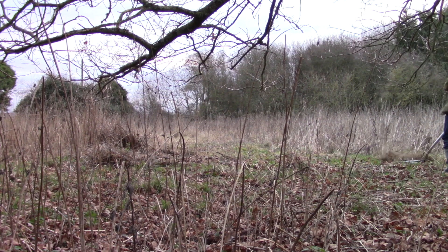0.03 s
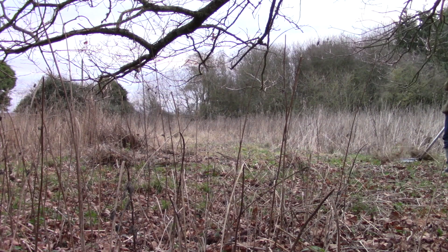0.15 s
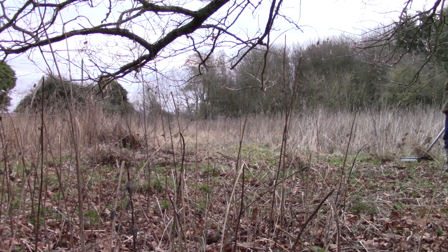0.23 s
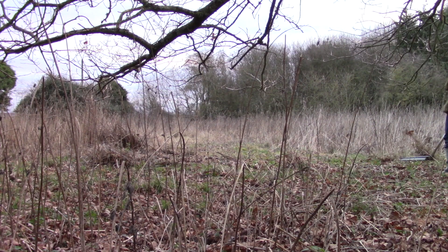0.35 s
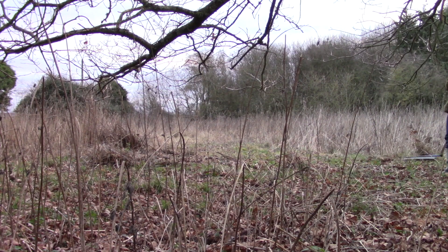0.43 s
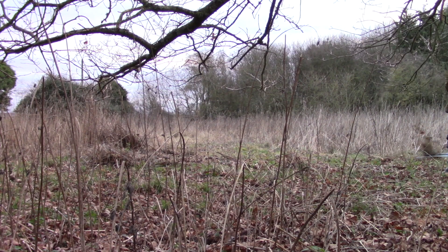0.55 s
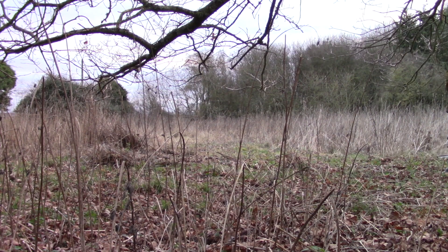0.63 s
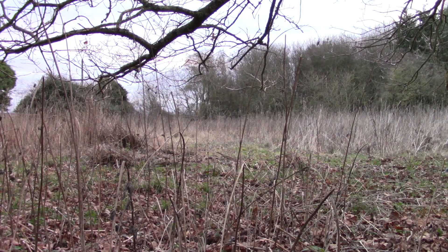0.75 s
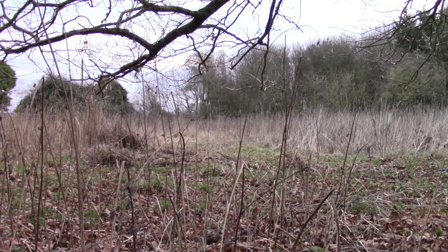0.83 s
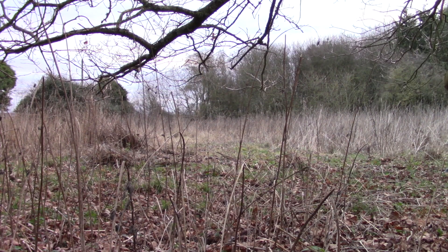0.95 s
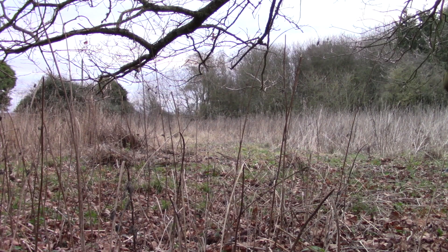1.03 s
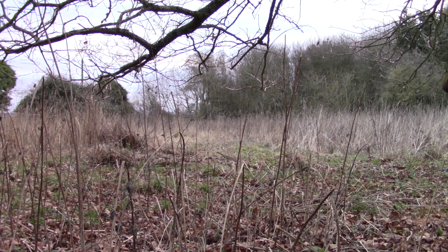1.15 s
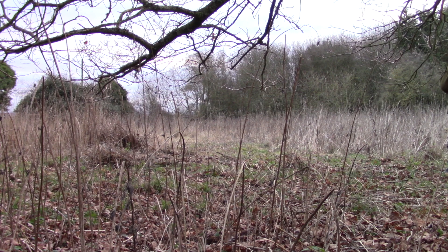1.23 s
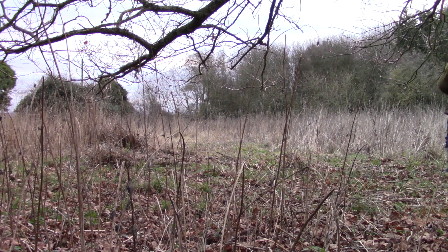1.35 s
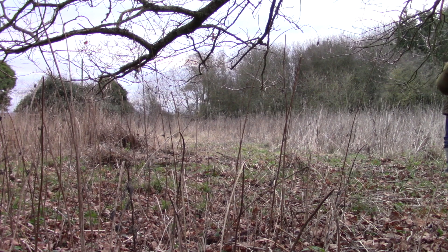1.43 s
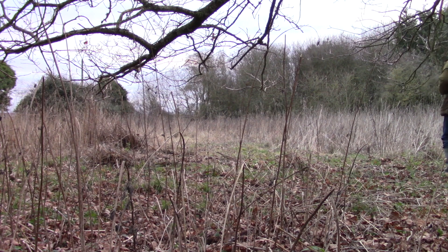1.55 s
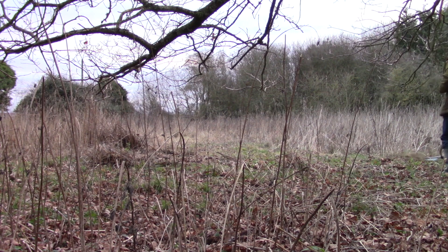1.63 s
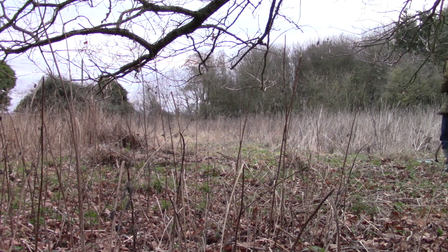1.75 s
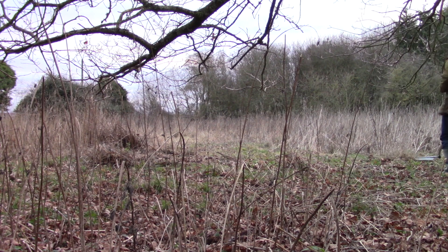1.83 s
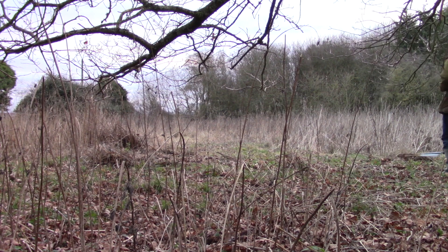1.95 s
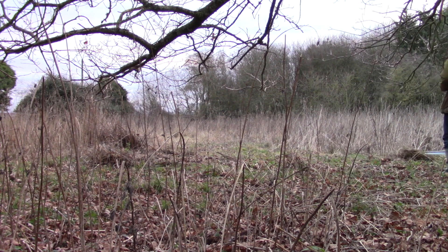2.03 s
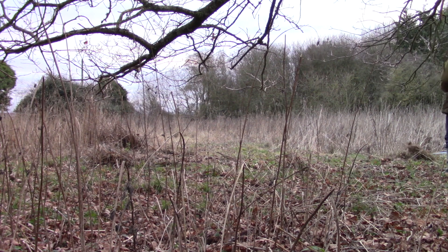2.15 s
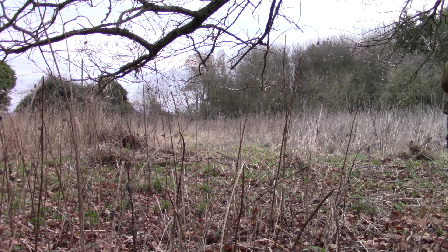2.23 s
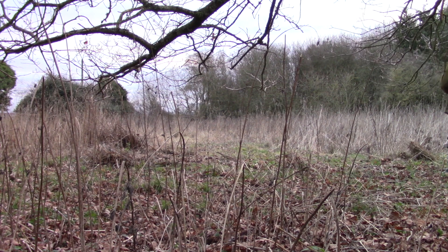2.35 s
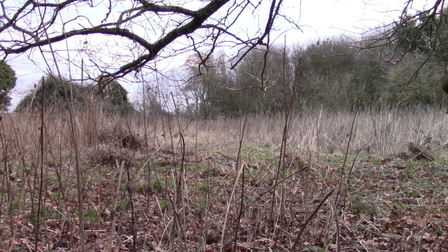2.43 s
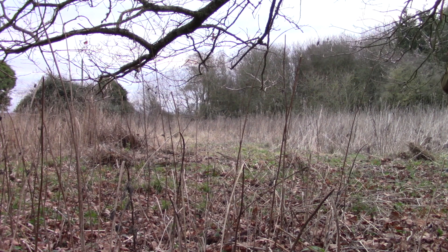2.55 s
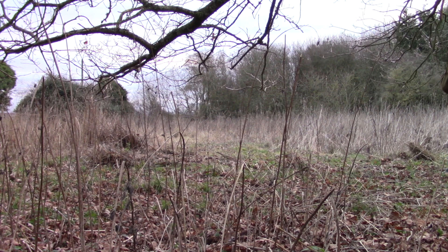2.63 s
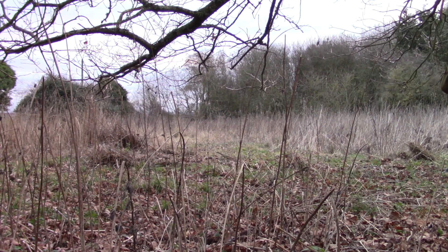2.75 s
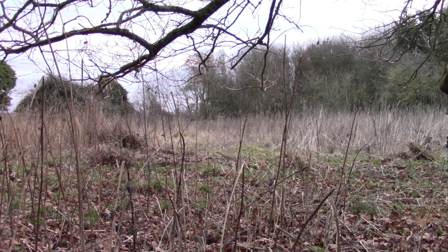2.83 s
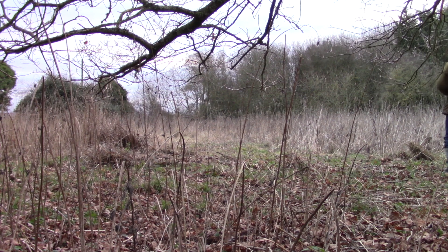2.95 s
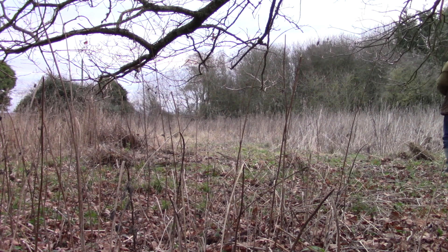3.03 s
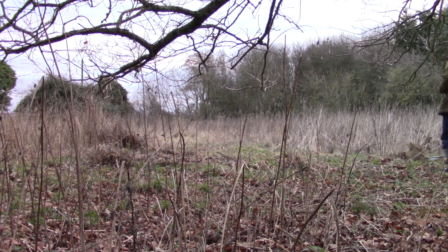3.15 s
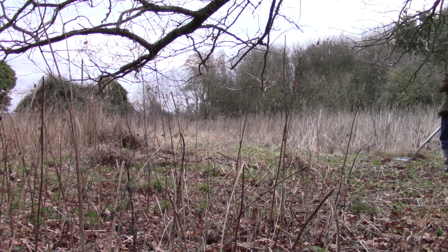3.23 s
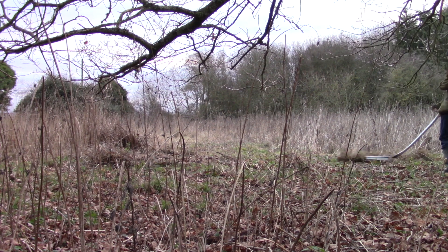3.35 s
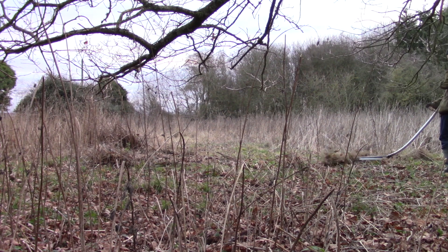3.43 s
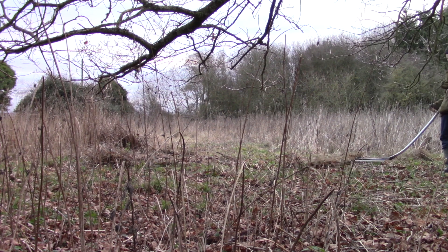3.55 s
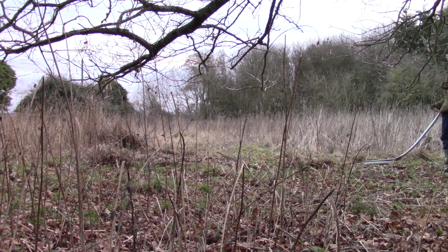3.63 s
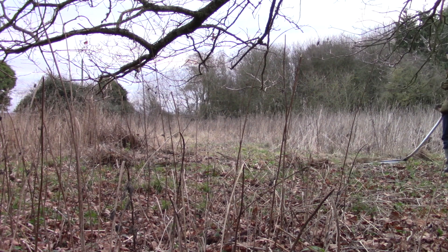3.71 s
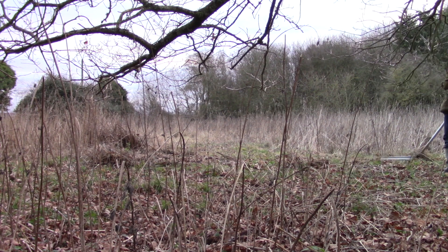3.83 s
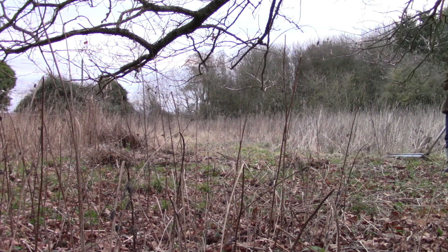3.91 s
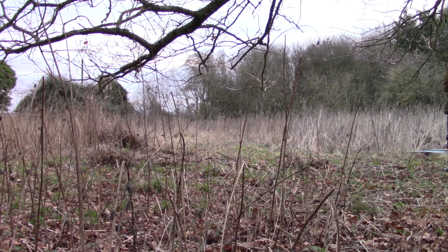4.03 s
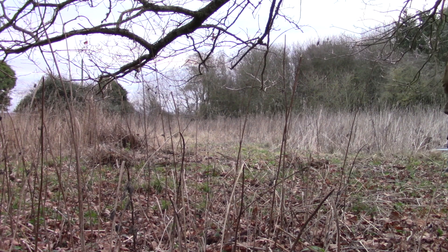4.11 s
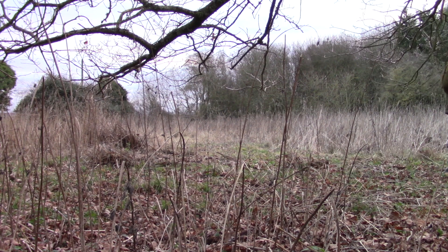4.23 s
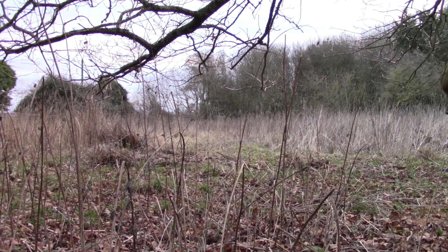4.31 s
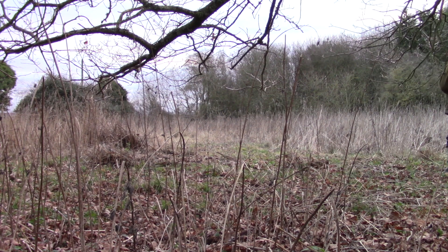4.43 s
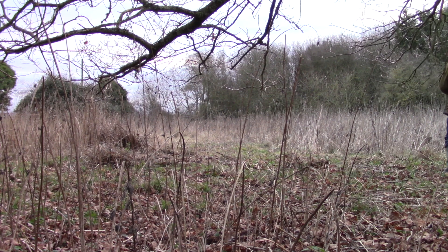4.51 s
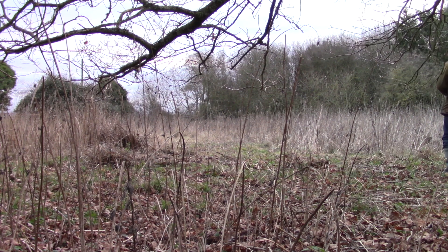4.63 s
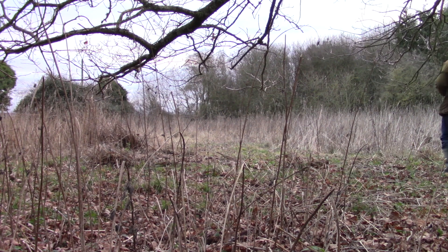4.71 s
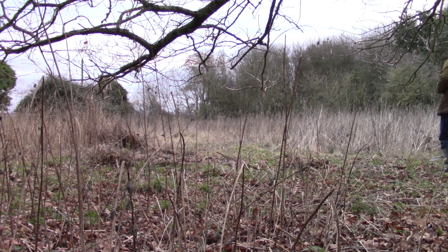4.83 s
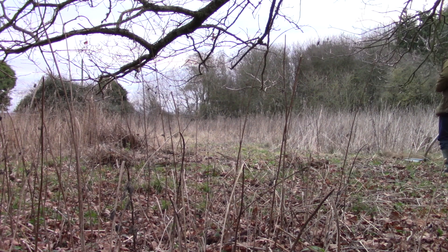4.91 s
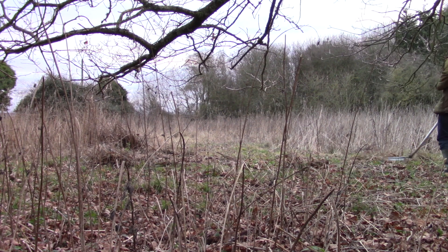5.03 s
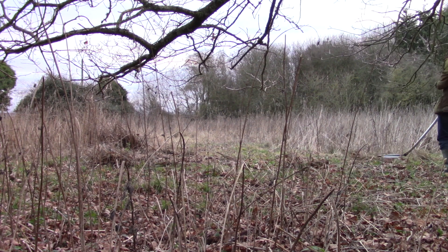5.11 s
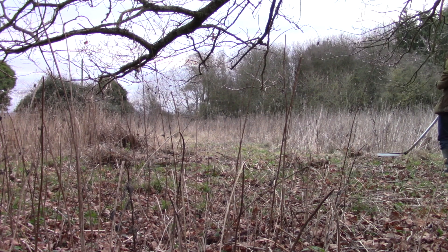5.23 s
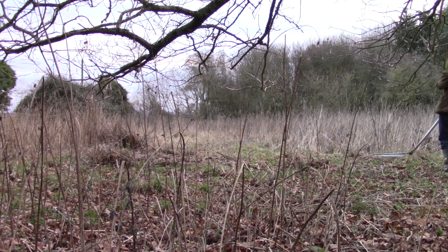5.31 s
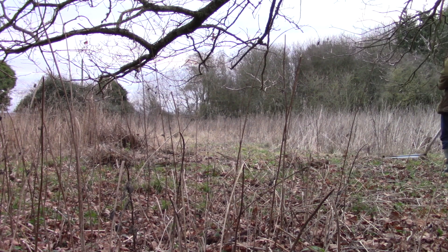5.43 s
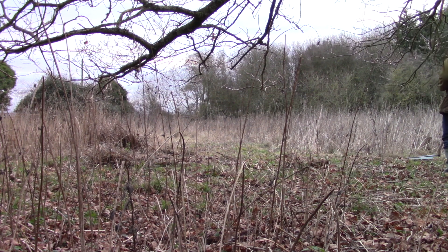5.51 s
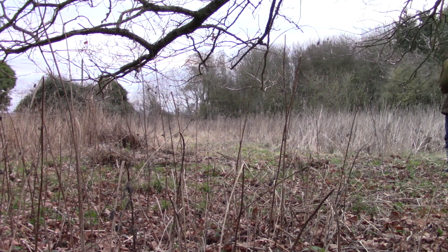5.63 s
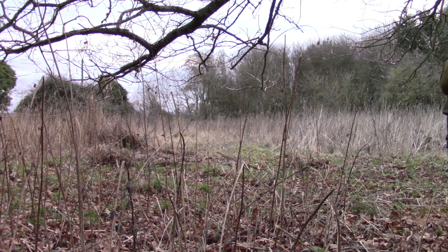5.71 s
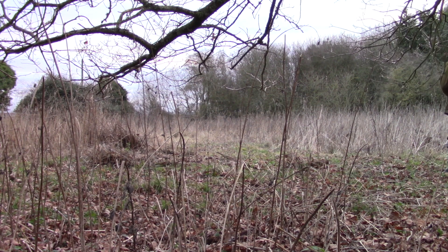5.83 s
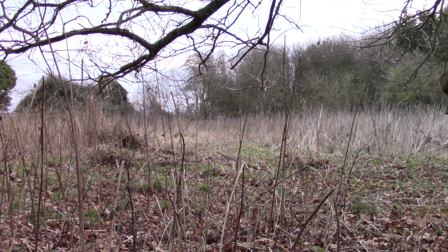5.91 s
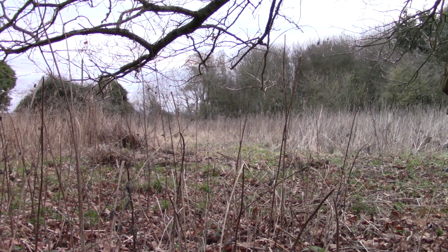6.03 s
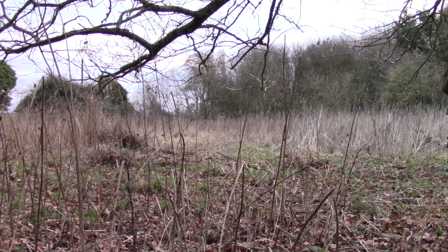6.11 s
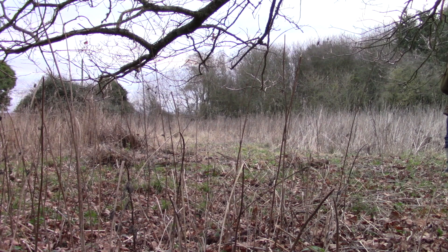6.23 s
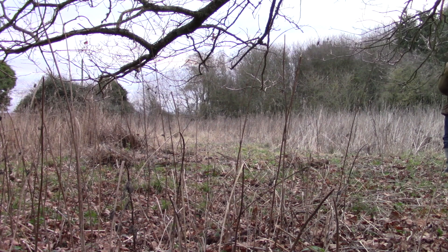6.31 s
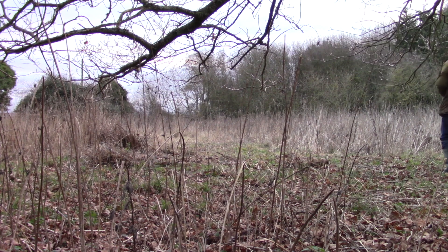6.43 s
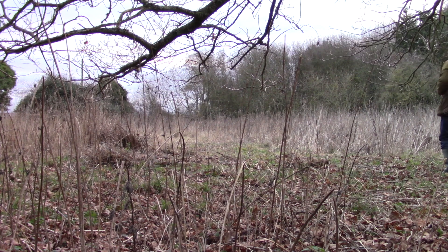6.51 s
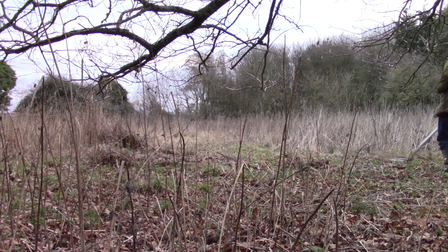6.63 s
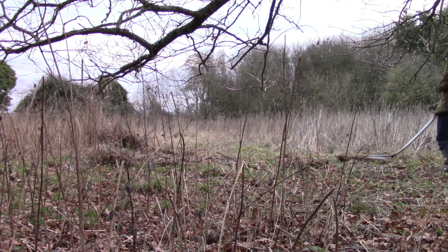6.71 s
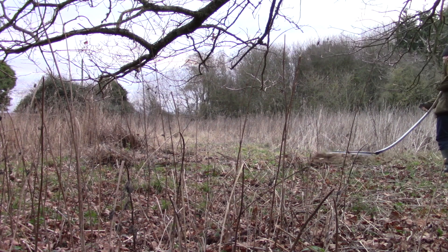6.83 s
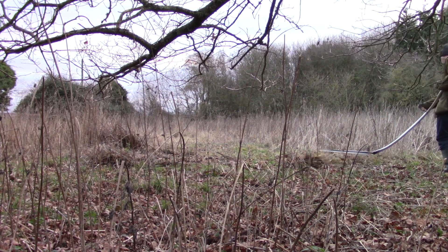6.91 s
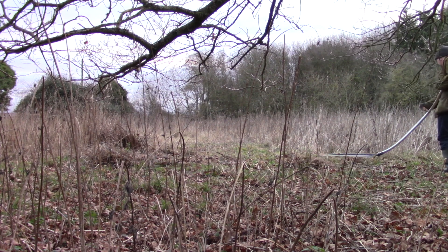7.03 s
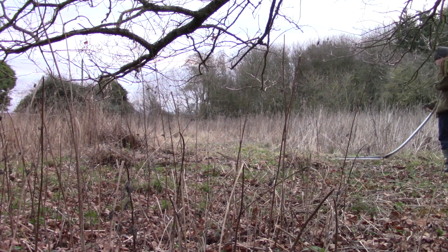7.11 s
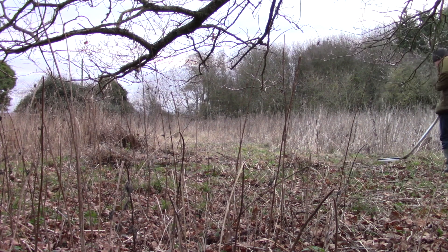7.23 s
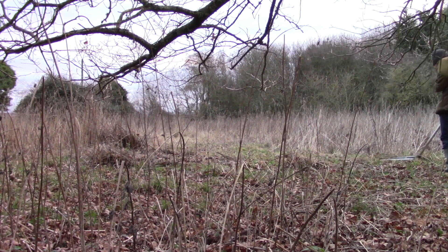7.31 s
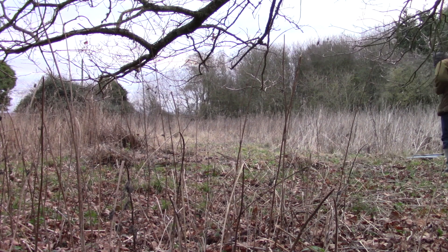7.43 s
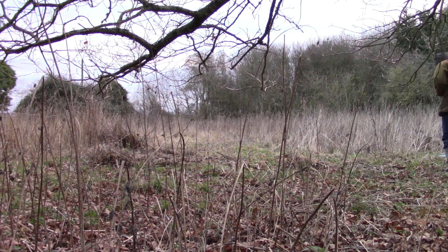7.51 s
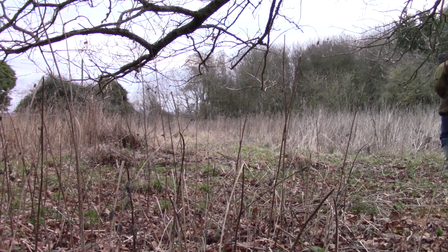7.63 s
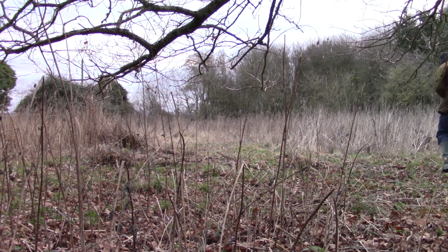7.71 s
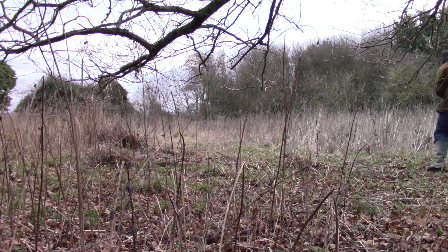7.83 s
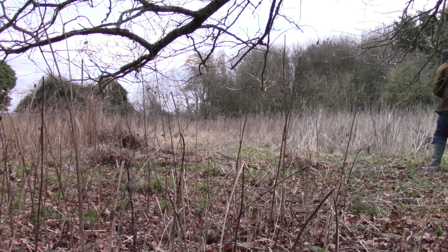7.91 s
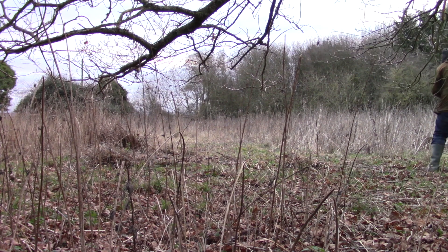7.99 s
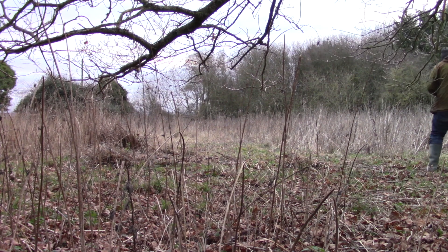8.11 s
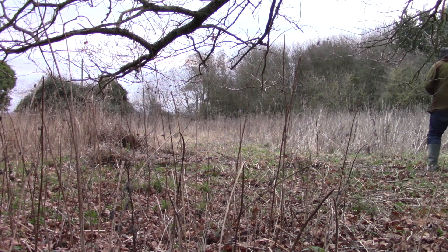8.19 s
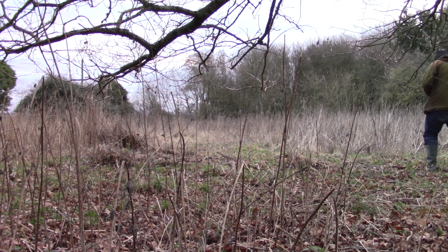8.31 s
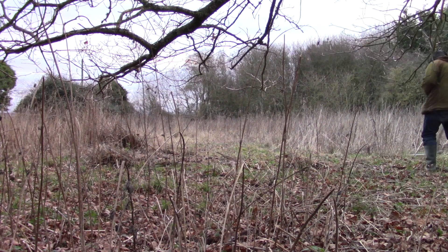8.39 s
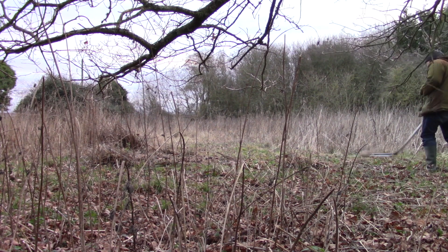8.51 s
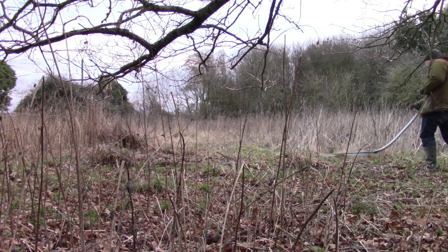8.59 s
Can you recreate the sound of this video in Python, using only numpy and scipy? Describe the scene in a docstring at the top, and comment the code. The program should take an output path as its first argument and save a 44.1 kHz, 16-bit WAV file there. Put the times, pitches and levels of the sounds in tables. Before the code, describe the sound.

Close, bright, crackly sweeps of a blade cutting dry stems, each followed by a gentler rustle, over faint distant traffic and a low hum.

```python
"""Tall dry grass rustles and tears close in front as a scythe cuts through it; a softer back-swing follows each cut.
Rustle and drag are flickering grains of noise, the push of moved grass is low lumps, breaking stems are short
bursts, and on some cuts a narrow noise band whines upward along the edge. Stems tap the steel blade, whose
modes ring faintly. The open field lies around it: far traffic and air, wide in the bass, with a low hum."""
import sys
import numpy as np
from scipy import signal
from scipy.fft import rfft, irfft, next_fast_len
from scipy.io import wavfile

SR = 44100
rng = np.random.default_rng(int(sys.argv[2]) if len(sys.argv) > 2 else 0)


def bounce(signal):
    """Save signal as a 16-bit WAV file at the path given by the first command-line argument."""
    frames = np.transpose(np.atleast_2d(signal))
    limited = np.clip(frames, -1, 1)
    pcm = np.round(limited * 32767).astype(np.int16)
    wavfile.write(sys.argv[1], SR, pcm)


N = 381906   # samples

# cuts and back-swings in turn, one list per movement, close by: start_s [s],
# rustle_db of the dry leaves [dB], drag_db of stems dragged over the blade [dB]
MOVEMENTS = [
    [(0.0, -26.5, -31), (0.012, -18, -13.5), (0.028, -14, -21.5), (0.092, -17.5, -29.5),
     (0.124, -20, -31.5), (0.2, -27.5, -34.5), (0.231, -26, -40), (0.339, -36.5, -47), (0.383, -37, -47)],
    [(0.391, -37.5, -52), (0.459, -34.5, -44), (0.686, -26.5, -33), (0.794, -31.5, -38),
     (0.882, -29.5, -35.5), (1.01, -31.5, -44.5), (1.098, -44, -46), (1.361, -50.5, -51.5),
     (1.469, -51, -53), (1.493, -58, -55)],
    [(1.501, -37, -47), (1.533, -47, -43), (1.616, -42, -31.5), (1.672, -38, -38), (1.7, -31, -30),
     (1.736, -13.5, -15.5), (1.764, -15, -19.5), (1.792, -18, -26), (1.828, -20, -27), (1.956, -38, -45.5)],
    [(1.964, -39, -45), (2.107, -39, -45.5), (2.147, -35.5, -36), (2.215, -40, -43), (2.275, -31, -44),
     (2.299, -44, -46), (2.638, -49, -47.5), (2.722, -47.5, -50), (2.834, -55, -57), (3.001, -64, -59),
     (3.025, -62, -55)],
    [(3.033, -62, -52), (3.041, -50, -46), (3.073, -46.5, -42), (3.209, -32.5, -31.5), (3.275, -23, -24),
     (3.293, -13, -15), (3.384, -14.5, -25.5), (3.488, -25, -32), (3.672, -30.5, -41), (3.704, -30, -41)],
    [(3.712, -32, -45), (3.903, -24, -28), (4.011, -27.5, -36), (4.087, -23.5, -36.5), (4.107, -31, -33),
     (4.27, -31.5, -39), (4.338, -42, -48), (4.41, -46, -40), (4.518, -53.5, -49.5), (4.725, -60, -61),
     (4.753, -53, -45)],
    [(4.761, -56, -53), (4.813, -49, -40.5), (4.897, -41, -32), (4.909, -26, -30), (4.945, -25.5, -24),
     (4.969, -13.5, -13), (5.009, -22.5, -25), (5.172, -24.5, -33), (5.316, -39.5, -47.5),
     (5.543, -45, -49.5)],
    [(5.551, -40, -57), (5.607, -27, -36), (5.643, -33.5, -32.5), (5.695, -24, -28), (5.775, -32.5, -34.5),
     (5.843, -27, -36.5), (5.872, -37, -36), (5.907, -41, -41.5), (6.174, -58.5, -53), (6.425, -62, -59)],
    [(6.433, -62, -54), (6.445, -54, -51), (6.525, -50, -43), (6.629, -27, -30), (6.657, -16, -13.5),
     (6.8, -20.5, -25.5), (6.84, -15.5, -29.5), (6.876, -25, -37), (6.924, -29, -41), (7.06, -31.5, -37.5),
     (7.176, -40.5, -50)],
    [(7.184, -40, -45), (7.283, -30, -41), (7.411, -22.5, -32), (7.443, -19, -22), (7.467, -22.5, -27.5),
     (7.754, -34, -35.5), (7.838, -33, -42.5), (8.066, -26, -35.5), (8.157, -45.5, -51), (8.281, -48, -57),
     (8.293, -46, -58)],
    [(8.301, -42, -56), (8.324, -44, -54), (8.332, -32, -37), (8.355, -36, -39), (8.375, -20, -30.5),
     (8.398, -24, -30), (8.408, -33, -37), (8.44, -32.5, -37), (8.545, -37.5, -40), (8.56, -30, -34),
     (8.61, -22, -26), (8.655, -21.5, -27)],
]
# spectrum of the rustling leaves: pitch_hz [Hz], level_db [relative dB per Hz]
RUSTLE_SPECTRUM = [(1760, -18.5), (3000, -5.5), (4860, -5), (5440, -3), (5960, -3.5), (7830, 0.5),
                   (9400, -1.5), (11200, -6.5), (12300, -9.5), (14100, -11), (16000, -25)]
# spectrum of the dragged stems: pitch_hz [Hz], level_db [relative dB per Hz]
DRAG_SPECTRUM = [(320, -13), (550, -27.5), (686, -11), (793, -3.5), (925, -7), (1040, -4.5), (1590, -3.5),
                 (1670, -6.5), (2720, 0), (5500, -8), (7150, -24), (12100, -120)]

# spectrum of the grass pushed aside: pitch_hz [Hz], level_db [relative dB per Hz]
PUSH_SPECTRUM = [(53, -42), (90, -17), (167, 1), (231, 0), (285, 3.5), (361, -0.5), (600, -7.5), (780, -26),
                 (1320, -120)]
# the blade shoves a whole swath aside: peak_s [s], peak_db [dB]
SWATH_SHOVES = [(0.021, -30), (1.725, -24), (3.252, -22.5), (3.369, -33), (3.663, -39), (4.955, -27.5),
                (6.679, -19), (6.784, -39), (7.048, -38), (7.429, -35), (8.037, -32), (8.616, -40)]
PUSH_DB, PUSH_FOLLOWS = -31.5, 0.62   # level at 0 dB of drag; share of the drag's swing in dB
SHOVE_RISE_S, SHOVE_T60_S, SHOVE_CREST_DB = .012, .3, 7   # crest: peak above rms

# modes of the steel blade: pitch_hz [Hz], tap_db when tapped at random [dB], t60_s [s]
BLADE_MODES = [(777, -8, .08), (1070, -5, .1), (1440, -10, .08), (1575, -8, .12), (1931, -8, .1),
               (2085, -8, .14), (2353, -11, .2), (2540, -5, .14), (2665, -4, .12), (2805, -4, .24),
               (3025, -7, .3), (3090, -6, .15), (3270, -8, .12), (3430, -9, .15), (3525, -9, .33),
               (3865, -8, .16), (4065, -10, .12), (4625, -12, .18), (5255, -13, .14), (5985, -15, .12)]
# stems that glance off the steel and wake mainly one mode: start_s [s], pitch_hz of that mode [Hz], ring_db [dB]
STEEL_PINGS = [(0.429, 3865, -30.5), (.55, 2540, -33), (.87, 2085, -31), (1.0, 2805, -43),
               (1.021, 3025, -37), (2.151, 2540, -34), (2.19, 5985, -32), (2.28, 3525, -44),
               (2.3, 3025, -44), (3.13, 2085, -31), (3.258, 2665, -26), (3.534, 4065, -23),
               (4.102, 2805, -35), (4.12, 2085, -33), (4.2, 5255, -30.5), (4.23, 3525, -31.5),
               (4.25, 4625, -38), (4.387, 2805, -31), (4.385, 3865, -33), (4.81, 2085, -36),
               (4.87, 2805, -27.5), (4.941, 2805, -16.5), (5.722, 1575, -25.5), (5.72, 2805, -32),
               (5.849, 2805, -30), (5.86, 2353, -42), (5.9, 3525, -48), (6.907, 3865, -30),
               (7.599, 2540, -32), (7.77, 3525, -40), (8.33, 3090, -39), (8.37, 3090, -28.5),
               (8.61, 1931, -26)]
# level of the taps at 0 dB of drag; share of the drag's swing in dB; spread of their slow wander
TAPS_DB, TAPS_FOLLOW, TAPS_WANDER_DB = -19.5, .92, 5

# spectrum of far traffic and air: pitch_hz [Hz], level_db [relative dB per Hz]
FIELD_SPECTRUM = [(18, -37), (30, -20), (75, -1), (199, -1), (319, -1.5), (394, -1.5), (740, -3),
                  (1720, -9), (2120, -12), (2410, -18), (8080, -21), (14000, -27), (16000, -42)]
# stereo width of the field: pitch_hz [Hz], side_db relative to the mid [dB]
FIELD_SIDE = [(25, -6), (60, -16), (130, -8), (300, -5), (600, -7.5), (1000, -9.5), (2200, -25.5),
              (3200, -20), (4000, -70)]
FIELD_DB = -45.5   # level of the mid
HUM_HZ, HUM_WIDTH_HZ, HUM_DB = 74.5, 8.7, -58.5

# single stems that break or knock: start_s [s], knock_hz of the woody knock [Hz], knock_db [peak dB],
# crack_hz [Hz], crack_db [peak dB], tick_db of the bright tick [peak dB]
STEM_SNAPS = [(0.145, 1410, -14.5, 2740, -24, -19), (0.237, 1410, -41, 4270, -27, -12),
              (0.428, 1150, -44, 3970, -28, -32), (0.868, 1900, -23.5, 2950, -20, -20),
              (0.92, 1900, -36, 4270, -25, -17), (0.985, 1720, -43, 3690, -41, -20),
              (1.018, 1040, -49, 3690, -29, -18), (1.126, 700, -40, 4600, -22, -23),
              (1.242, 700, -40, 4600, -38, -36), (1.292, 1410, -42, 2370, -46, -35),
              (1.377, 940, -23.5, 2950, -36, -52), (1.409, 1900, -46, 2740, -40, -54),
              (1.449, 770, -43, 2200, -54, -35), (1.501, 1900, -46, 2550, -32, -30),
              (1.768, 1150, -13.5, 2550, -6.5, -9), (1.837, 1410, -16, 3970, -30, -27),
              (1.98, 1900, -45, 2950, -34, -23), (2.136, 1150, -26, 2370, -37, -40),
              (2.271, 700, -42, 3690, -25, -19), (3.383, 1150, -21, 2550, -16, -8),
              (3.395, 1900, -32, 2740, -20, -13), (3.418, 1160, -12.5, 4600, -26, -13),
              (3.534, 1900, -36, 4270, -7.5, -15), (3.667, 1410, -32, 2740, -25, -23),
              (3.896, 1040, -33, 3420, -20, -17), (4.058, 1900, -31, 2950, -22, -16),
              (4.383, 1270, -39, 3690, -25, -32), (4.753, 1720, -36, 3400, -22.5, -39),
              (4.932, 1560, -22, 2740, -12, -20), (4.956, 940, -14.5, 3180, -1, -22),
              (4.964, 1900, -9, 2780, -4, -10), (5.058, 1150, -19, 3970, -20, -19),
              (5.213, 1900, -31, 2740, -22, -32), (5.264, 1150, -24.5, 3180, -33, -34),
              (5.366, 940, -38, 2950, -30, -28), (5.438, 940, -40, 2740, -30, -37),
              (5.6, 1150, -34, 3970, -22, -22), (5.842, 700, -45, 4270, -26, -20),
              (6.22, 940, -35, 3180, -33, -51), (6.255, 700, -44, 3420, -46, -41),
              (6.275, 940, -28.5, 2370, -53, -50), (6.298, 1040, -40, 3420, -37, -47),
              (6.393, 1560, -47, 2200, -47, -42), (6.408, 940, -41, 3180, -39, -38),
              (6.657, 774, -22, 2970, -5, -10), (6.799, 1270, -17, 4600, -29, -25),
              (6.902, 1720, -29, 4600, -16, -8), (6.965, 1150, -22, 2370, -28, -34),
              (7.037, 1900, -26, 3970, -16, -23), (7.043, 900, -17, 2100, -9.5, -16),
              (7.429, 1900, -23, 3970, -16, -12), (7.841, 850, -39, 2950, -30, -21),
              (8.29, 1030, -33, 4270, -26.5, -18), (8.328, 1410, -34, 3420, -27, -29),
              (8.42, 1030, -12.5, 3300, -8, -3)]
SNAP_T60_S, SNAP_T60_S_PER_DB = .02, .0002   # at 0 dB; thicker, louder stems last longer
SNAP_OCTAVES, SNAP_OCTAVES_PER_DB = .95, .012   # width of knock and crack at 0 dB; louder breaks are broader
TICK_HZ, TICK_OCTAVES = 8000, 1.01

# stems sliding along the edge: start_s [s], end_s [s], from_hz [Hz], width_hz [Hz], level_db before the swell [dB]
EDGE_WHINES = [(1.518, 1.582, 790, 300, -40.5), (1.565, 1.702, 2094, 800, -36),
               (1.611, 1.696, 780, 300, -35), (3.036, 3.115, 748, 550, -38.5),
               (3.092, 3.213, 2100, 900, -34.5), (4.808, 4.921, 2190, 500, -36.5),
               (4.861, 4.913, 763, 300, -41), (6.44, 6.482, 800, 250, -43), (6.478, 6.611, 1915, 300, -36),
               (6.561, 6.624, 744, 250, -43)]
WHINE_CLIMB = 1.75   # end pitch as a multiple of the start pitch

# faint stereo spread near 6 kHz: pitch_hz [Hz], side_db relative to the mid [dB]
TREBLE_SIDE = [(4600, -71), (5200, -34), (5700, -18), (6300, -19.5), (7000, -22), (8000, -52)]
CUTOFF_HZ = 16000   # top of the recorded band


def from_db(db):
    """Decibels to gain."""
    return 10 ** (np.asarray(db) / 20)


def rms_one(x):
    """Scale to rms 1."""
    return x / np.sqrt(np.mean(x ** 2) + 1e-20)


def at_hz(points, hz):
    """Read a spectrum on a log-frequency axis."""
    points_hz, points_db = np.array(points).T
    return np.interp(np.log(hz), np.log(points_hz), points_db)


def bins_hz(size):
    """Frequencies of the FFT bins, kept off zero for the logarithm."""
    return np.maximum(np.arange(size // 2 + 1) * SR / size, 1)


def shaped(x, spectrum):
    """Filter x by the spectrum (dB)."""
    size = next_fast_len(N)
    gain = from_db(at_hz(spectrum, bins_hz(size)))
    return irfft(rfft(x, size) * gain, size)[..., :N]


def coloured(x, spectrum):
    """Give white x the spectrum (dB per Hz); rms 1."""
    return rms_one(shaped(x, spectrum))


def drift(rate_hz):
    """Slow chance of rms 1: noise through a double one-pole low-pass, run in."""
    step = 40   # samples between the slow values
    pole = np.exp(-2 * np.pi * rate_hz * step / SR)
    noise = rng.standard_normal(N // step + 2002)
    slow = signal.lfilter([1], [1, -2 * pole, pole * pole], noise)[2000:]
    return np.interp(np.arange(N) / step, np.arange(len(slow)), rms_one(slow))


def grains(per_s, spread_db, clump_db, tears_per_s):
    """Random clicks of uneven size that come in clumps; a tearing stem lifts them at once, then dies away; rms 1."""
    sizes = from_db(spread_db * np.minimum(rng.exponential(1, N), 5)) * rng.standard_normal(N)
    born = rng.random(N) < per_s / SR
    tears = (rng.random(N) < tears_per_s / SR) * np.minimum(rng.exponential(0.6, N), 1.6)
    decay = from_db(-60 / (0.06 * SR))   # 60 dB down in 0.06 s
    tearing = 1 + signal.lfilter([1], [1, -decay], tears)
    clumps = from_db(clump_db * (drift(25) + drift(35)))
    return rms_one(sizes * born * tearing * clumps)


def patchy(x, spectrum, patchy_db, count):
    """Colour x; each of count bands flickers on its own, as other stems take over; rms 1."""
    size = next_fast_len(N)
    low_hz, high_hz = spectrum[0][0], spectrum[-1][0]
    octave_share = np.log(bins_hz(size) / low_hz) / np.log(high_hz / low_hz)
    place = (count - 1) * np.clip(octave_share, 0, 1)
    bins = rfft(coloured(x, spectrum), size)
    out = 0
    for k in range(count):
        band = np.cos(np.pi / 2 * np.clip(place - k, -1, 1)) ** 2   # overlapping bands add up to 1
        out = out + irfft(bins * band, size)[:N] * from_db(patchy_db * drift(23.7))
    return rms_one(out)


def narrow(hz, width_hz):
    """Noise in a narrow band around the pitch curve hz; rms 1."""
    phase = 2 * np.pi * np.cumsum(hz) / SR
    lowpass = signal.butter(2, width_hz / 2, fs=SR, output="sos")
    slow = signal.sosfilt(lowpass, rng.standard_normal((2, len(hz))))
    return rms_one(slow[0] * np.cos(phase) + slow[1] * np.sin(phase))


def rustle(rustle_db):
    """Dry leaves brush together: dense bright grains under the swing's level curve."""
    leaves = grains(9000, spread_db=-1.5, clump_db=0.5, tears_per_s=21)
    return from_db(rustle_db) * patchy(leaves, RUSTLE_SPECTRUM, patchy_db=1.2, count=14)


def drag(drag_db):
    """Stems scrape over the blade: sparser, lower and more uneven grains."""
    stems = grains(5000, spread_db=1.0, clump_db=0.5, tears_per_s=30)
    return from_db(drag_db) * patchy(stems, DRAG_SPECTRUM, patchy_db=2.5, count=24)


def push(drag_db):
    """Low lumps of moved grass follow the drag; each shove swells quickly and dies away."""
    t = np.arange(N) / SR
    gain = from_db(PUSH_DB + PUSH_FOLLOWS * drag_db)
    for peak_s, peak_db in SWATH_SHOVES:
        rise = np.clip(1 + (t - peak_s) / SHOVE_RISE_S, 0, 1)
        fall_db = 60 * np.maximum(t - peak_s, 0) / SHOVE_T60_S
        gain = gain + rise * from_db(peak_db - SHOVE_CREST_DB - fall_db)
    lumps = grains(600, spread_db=0.5, clump_db=0.5, tears_per_s=12)
    return gain * coloured(lumps, PUSH_SPECTRUM)


def blade(drag_db):
    """Random taps keep all modes murmuring; a ping wakes its own mode fully and the others more faintly."""
    taps_db = TAPS_DB + TAPS_FOLLOW * drag_db + TAPS_WANDER_DB * drift(4.7)
    start_s, ping_hz, ring_db = np.transpose(STEEL_PINGS)
    out = np.zeros(N)
    for hz, tap_db, t60_s in BLADE_MODES:
        tapped = (rng.random(N) < 250 / SR) * rng.standard_normal(N)   # 250 taps per second
        hits = tapped * from_db(taps_db + tap_db + 5.3 * drift(5.6))
        octaves_off = np.abs(np.log2(hz / ping_hz))
        loss_db = np.minimum(250 * octaves_off, 14 + 15 * octaves_off)
        np.add.at(hits, (start_s * SR).astype(int), from_db(ring_db - loss_db))
        r, w = from_db(-60 / (t60_s * SR)), 2 * np.pi * hz / SR   # decay and turn per sample
        out += signal.lfilter([0, np.sin(w)], [1, -2 * r * np.cos(w), r * r], hits + 1e-18)
    return out


def field():
    """Far traffic and air, wide in the bass, with a wavering low hum."""
    mid, side = coloured(rng.standard_normal((2, N)), FIELD_SPECTRUM)
    stereo = mid + shaped(side, FIELD_SIDE) * [[1], [-1]]
    air = from_db(FIELD_DB + 0.8 * drift(9)) * stereo
    return air + from_db(HUM_DB) * narrow(np.full(N, HUM_HZ), HUM_WIDTH_HZ)


def snaps():
    """A breaking stem is a dying burst of noise: a woody knock, a crack and a bright tick; the lows last longer."""
    t = np.arange(2048) / SR
    out = np.zeros(N + len(t))
    noise = rng.standard_normal((len(STEM_SNAPS), 3, len(t)))
    for (start_s, knock_hz, knock_db, crack_hz, crack_db, tick_db), draws in zip(STEM_SNAPS, noise):
        peak_db = max(knock_db, crack_db, tick_db)
        t60_s = SNAP_T60_S + SNAP_T60_S_PER_DB * peak_db
        octaves = SNAP_OCTAVES + SNAP_OCTAVES_PER_DB * peak_db
        # pitch, peak level, width in octaves, share of the decay time
        parts = [(knock_hz, knock_db, octaves, 1.5),
                 (crack_hz, crack_db, octaves, 1.05),
                 (TICK_HZ, tick_db, TICK_OCTAVES, .8)]
        first = int(start_s * SR)
        for (hz, part_db, width, lasting), draw in zip(parts, draws):
            half = 2 ** (np.clip(width, .2, 3) / 2)
            edges_hz = [hz / half, min(hz * half, .45 * SR)]
            band = signal.butter(2, edges_hz, "band", fs=SR, output="sos")
            dying = draw * from_db(-60 * t / max(lasting * t60_s, .001))
            burst = signal.sosfilt(band, dying)
            out[first:first + len(t)] += from_db(part_db) * burst / np.abs(burst).max()
    return out[:N]


def whines():
    """The slip rate climbs as the blade speeds up; the stems grip unevenly."""
    out = np.zeros(N)
    for start_s, end_s, from_hz, width_hz, level_db in EDGE_WHINES:
        a, b = int(start_s * SR), int(end_s * SR)
        swell = np.sin(np.linspace(0, np.pi, b - a)) ** 0.35
        pitch_hz = np.linspace(from_hz, WHINE_CLIMB * from_hz, b - a)
        out[a:b] += from_db(level_db) * swell * narrow(pitch_hz, width_hz)
    return out * from_db(0.95 * drift(52))


def scene():
    """The mowing is one near source in the middle, the field lies around it."""
    rows = sorted(sum(MOVEMENTS, []), key=lambda row: row[0])
    start_s, *levels = np.transpose(rows)
    rustle_db, drag_db = [np.interp(np.arange(N) / SR, start_s, level) for level in levels]
    near = rustle(rustle_db) + drag(drag_db) + push(drag_db) + blade(drag_db) + snaps() + whines()
    # thin stems and steel radiate no deep bass
    no_bass = signal.butter(3, 85, "high", fs=SR, output="sos")
    return signal.sosfilt(no_bass, near) + field()


def record(dry):
    """A faint stereo spread near 6 kHz is added; peaks are rounded, the top is cut steeply."""
    side = shaped(dry.mean(axis=0), TREBLE_SIDE)
    side = .7 * side + .7 * np.roll(side, 90)   # joined by a copy 90 samples (2 ms) later
    spread = dry + side * [[-1], [1]]   # taken from the left, added to the right
    rounded = .95 * np.tanh(spread / .95)
    top_cut = signal.ellip(12, .5, 70, CUTOFF_HZ, fs=SR, output="sos")
    return signal.sosfilt(top_cut, rounded)


dry = scene()
out = record(dry)
bounce(out)
```